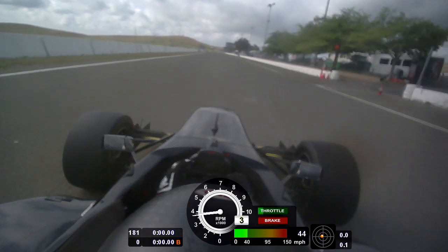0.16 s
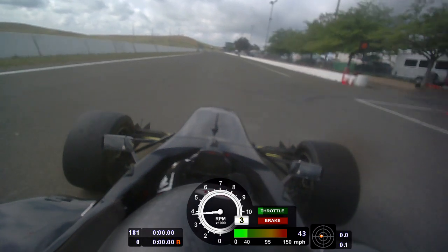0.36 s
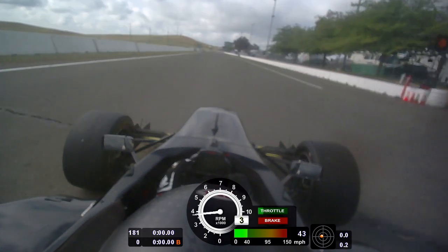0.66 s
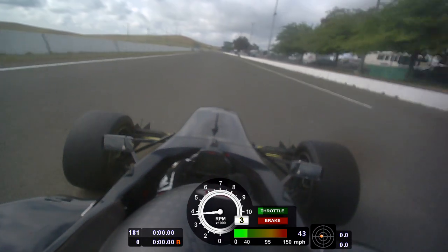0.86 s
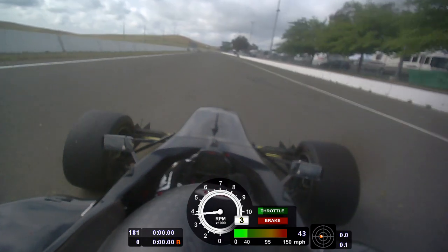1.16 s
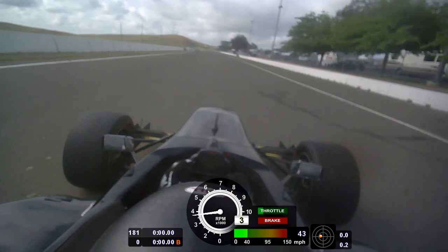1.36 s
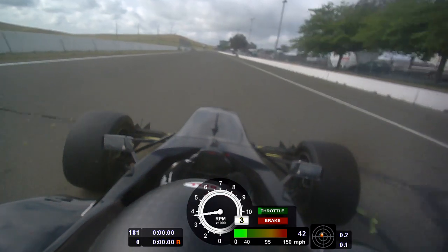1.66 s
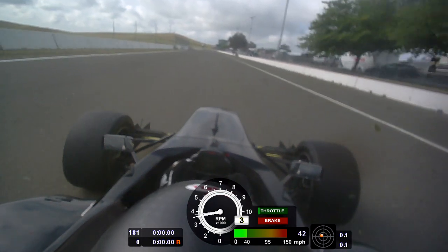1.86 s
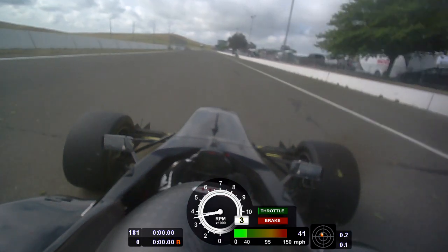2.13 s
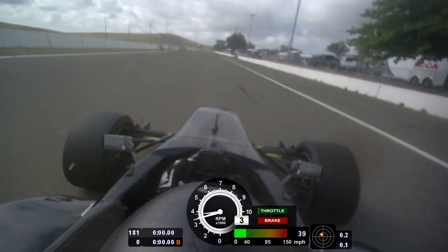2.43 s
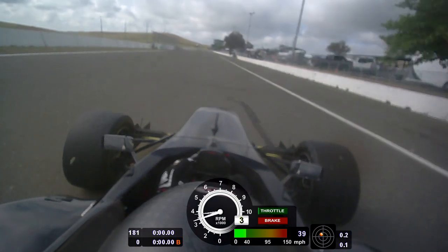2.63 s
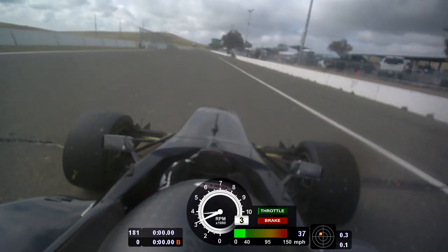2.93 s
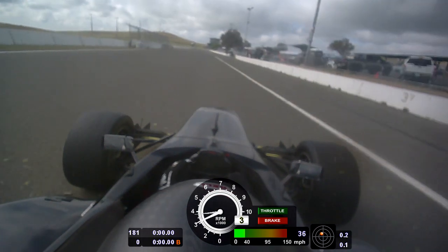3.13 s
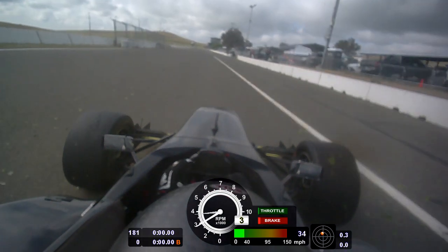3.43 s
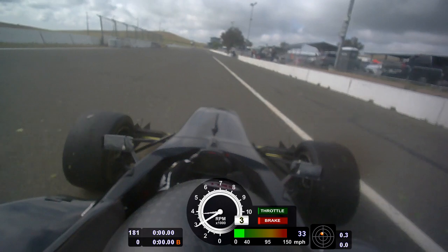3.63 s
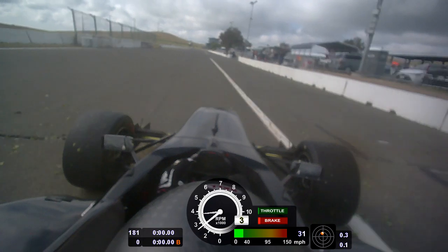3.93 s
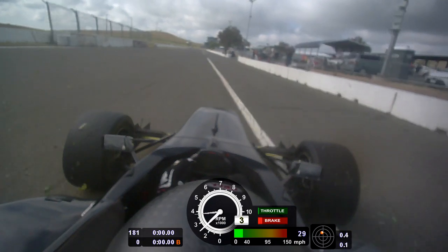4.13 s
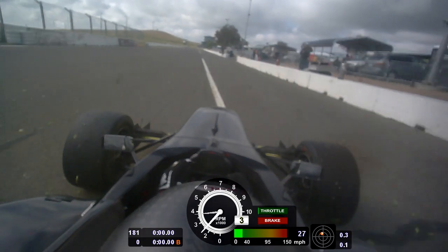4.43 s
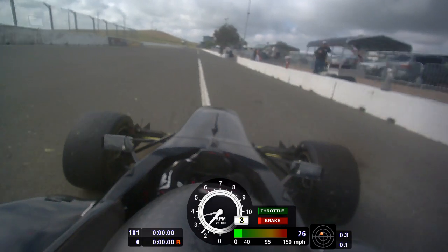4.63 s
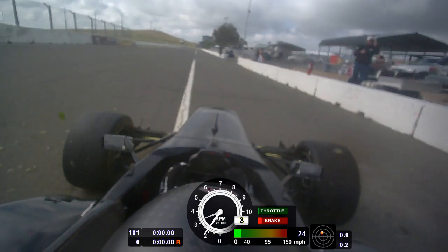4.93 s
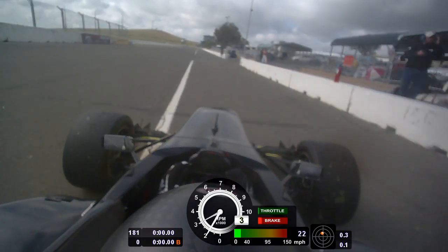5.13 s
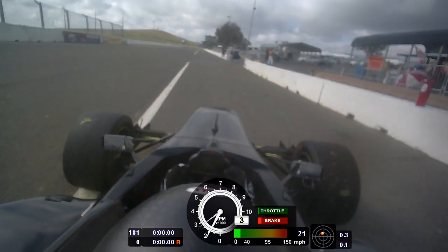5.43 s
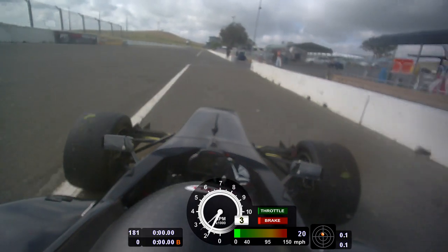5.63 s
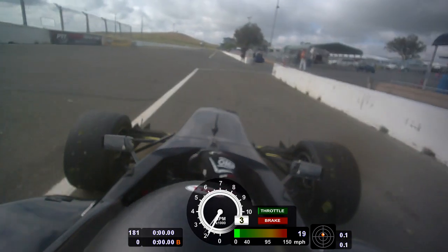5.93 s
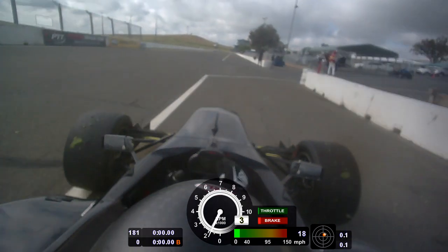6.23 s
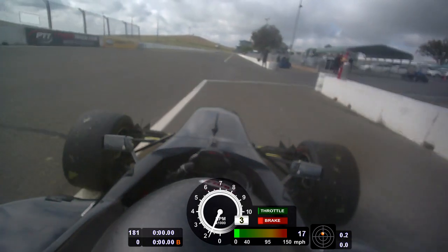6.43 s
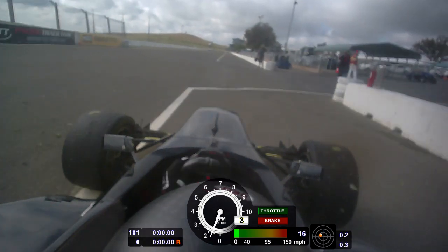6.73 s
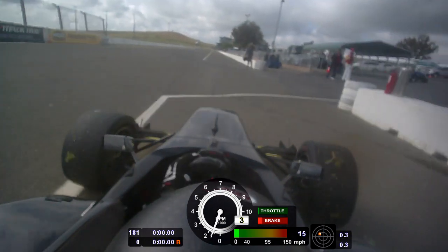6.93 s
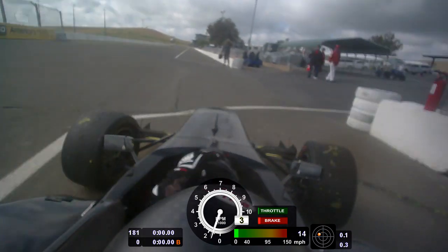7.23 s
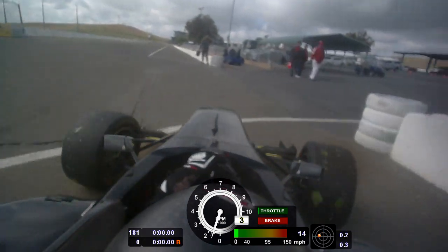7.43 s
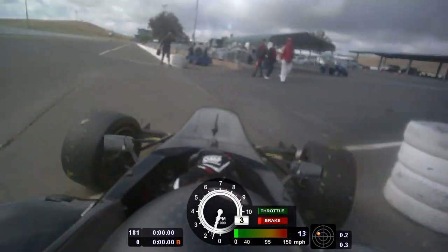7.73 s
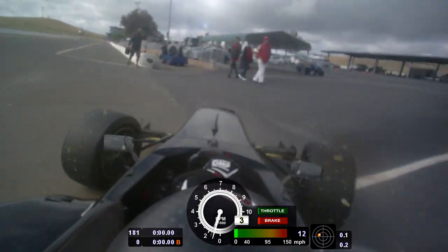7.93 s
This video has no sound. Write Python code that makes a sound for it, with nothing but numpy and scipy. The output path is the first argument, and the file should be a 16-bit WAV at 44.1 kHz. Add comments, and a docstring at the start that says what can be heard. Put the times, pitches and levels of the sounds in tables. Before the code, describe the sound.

A microphone fixed to an open-wheel car hears it slow down outdoors. First a buzzing four-cylinder engine and whining straight-cut gears at constant pitch over tyre rumble. After the lift-off the tone wobbles, turns boomy and glides downward. At low speed the car bucks, with throbbing exhaust surges and loose driveline clunks. Near the end the revs hop up and settle into a dry, ticking idle.

```python
"""On board a single-seater in the pit lane

A four-cylinder car cruises with whining gears, lifts off and booms on the overrun, lugs until the
driveline knocks through its backlash, then settles to a clattering idle. Firing and tooth meshing are
harmonics of the crank, shaped by pipe, gearbox and body resonances. Noise makes the rumble and hiss of
the tyres; short bursts make knocks and grit; gliding sines make two brake squeaks."""
import sys
import numpy as np
from scipy import signal
from scipy.fft import rfft, irfft, next_fast_len
from scipy.io import wavfile

SR = 44100
rng = np.random.default_rng(int(sys.argv[2]) if len(sys.argv) > 2 else 0)


def wav_out(sig):
    """Save sig, one row per channel (or a flat mono array), as 16-bit PCM at SR to the path in sys.argv[1]."""
    wavfile.write(sys.argv[1], SR, np.round(np.clip(np.atleast_2d(sig).T, -1, 1) * 32767).astype(np.int16))


N = 355887
TIME = np.arange(N) / SR

# crankshaft speed without the lurches: time_s, crank_turns_per_s
CRANK_SPEED = [(0, 63.2), (1.22, 63.1), (1.7, 60.1), (2.45, 56.0), (2.95, 52.3), (3.5, 46.8), (3.75, 44.6),
               (4.15, 40.4), (4.66, 36.5), (5.03, 29.5), (5.27, 27), (5.52, 32.5), (6.12, 23.4), (6.42, 22),
               (6.88, 22), (7.07, 40.8), (7.7, 34.5), (8.07, 33.2)]
# drivetrain state: time_s, throttle_0_to_1, steady_tooth_contact_0_to_1, clutch_free_0_to_1
DRIVE_STATE = [(0, 1, 1, 0), (.8, .75, 1, 0), (1.235, .8, 1, 0), (1.25, 0, 0, 0), (1.3, .3, .3, 0),
               (1.35, 0, 1, 0), (4.67, 0, 1, 0), (4.73, 0, 0, 0), (6.85, 0, 0, 0), (7.1, 0, 0, 1)]
# car lurches while lugging: centre_s, half_length_s, crank_kick_turns_per_s, boom_swell_db
CAR_LURCHES = [(4.785, 0.022, 0, 11.5), (4.872, .06, 2.5, 14), (5.033, 0.046, 0, 9.5),
               (5.124, 0.046, 4, 11), (5.278, 0.038, 0, 8.5), (5.349, .035, 3.5, 9.5),
               (5.5, 0.026, 0.92, 12), (5.616, 0.024, 1, 12.5), (5.795, 0.043, 0.43, 4),
               (5.939, 0.0517, 3, 7), (6.098, 0.037, 0, 6.5), (6.278, .08, 4.5, -2.5), (6.63, 0.084, 3, 7)]
# speed over the ground: time_s, road_speed_m_per_s
ROAD_SPEED = [(0, 19), (1.5, 19), (3, 16.5), (5, 10.3), (8.07, 5.4)]

# firing tones before pipe and pace: crank_multiple, throttle_db, overrun_db, lugging_db, idling_db
FIRING_TONES = [(2, -29.5, -11, -19.5, -36), (4, -12.5, -12, -27, -29), (6, -18, -21.5, -24, -18.5)]
# exhaust pass band, which the firing tones slide through: frequency_hz, gain_db
PIPE_PASS_BAND = [(55, -21), (86, -13.5), (102, -5.5), (116, 0.5), (128, -1), (145, 0), (172, -3.5),
                  (204, -24.5), (250, -25), (305, -33.5), (375, -21.5)]
# weaker engine orders at top crank speed: crank_multiple, throttle_db, overrun_db
WEAK_ENGINE_ORDERS = [(1, -39, -42), (1.5, -55, -47), (2.5, -52, -36), (3, -50, -41), (3.5, -36, -47),
                      (5, -53, -46), (8, -40, -53)]
# brief dips of the boom: centre_s, dip_db
BOOM_FALTERS = [(3.11, 6), (4.485, 10), (4.545, 9.5), (6.74, 12), (6.95, 15), (7.2, 5), (7.64, 7)]
FALTER_S, IDLE_FALTER_S = 0.014, 0.059   # half length with teeth in steady contact, and without
# exhaust pipe resonance, applied twice, and the nominal level of ragged firing
PIPE_HZ, PIPE_WIDTH_HZ, LUG_DB = 141.7, 26, -18
RAGGED_TOP_PACE = .55   # ragged firing grows with crank speed up to this share of top speed

# tooth tones before mounts and pace: mesh_multiple, throttle_db, overrun_db, flutter_db, flutter_pole_hz
TOOTH_TONES = [(1, -53.5, -53.5, 1.6, 31), (2, -54, -53.5, 2.4, 55), (3, -65, -63.5, 3, 40),
               (4, -52, -59, 3.5, 55), (5, -52, -70, 2, 35), (7, -63, -74.5, 2.5, 35),
               (8, -69, -77, 2.5, 35)]
# gearbox mount resonances: centre_hz, nominal_width_hz, power_lift_db
MOUNT_RESONANCES = [(605, 41, 17.5), (813, 43, 13.5), (863, 74, 16.5), (970, 100, 13.5), (1180, 120, 3.5),
                    (1380, 70, 7.5), (1815, 125, 17.5), (2400, 280, 8.5), (3140, 150, 5)]
# further gear lines, before the body resonances: crank_multiple, throttle_db, overrun_db
GEAR_LINES = [(13, -57, -65), (16, -55, -73.5), (29, -65, -61)]
# gear lines before the casing resonance: crank_multiple (sounded to the nearest half), throttle_db, overrun_db
CASING_LINES = [(28, -62, -57), (29, -64, -53), (31, -43.5, -61), (32.7, -54, -49.5), (35.1, -48, -50.5)]
GEARBOX_HZ, GEARBOX_WIDTH_HZ = 1856, 150   # ring of the gearbox casing
MESH_TEETH = 15
LOOSE_TEETH_DB, FREE_TEETH_DB = -5.5, -16   # whine when lugging, and with the clutch free
# the gears float for an instant as the throttle shuts
SLACK_S, SLACK_HALF_S, SLACK_WHINE_DB = 1.265, .026, -7

# force spectrum of the driven clatter: frequency_hz, relative_density_db_per_hz
CLATTER_SPECTRUM = [(200, 0), (450, 3.5), (900, 3.5), (1450, -2), (1900, 1), (2500, 0.5), (4400, -7.5),
                    (4900, -8.5), (7000, -15), (10000, -32), (12000, -32), (16000, -33)]
# force spectrum of the idling engine: frequency_hz, relative_density_db_per_hz
IDLE_SPECTRUM = [(200, -1.5), (330, 13), (480, -7.5), (900, 3.5), (1500, -3.5), (1900, -1), (2800, 0.5),
                 (4400, -5.5), (6200, -11), (8000, -20), (10000, -35), (12000, -36), (16000, -43)]
# nominal level at top crank speed; added under throttle
CLATTER_DB, CLATTER_LOAD_DB = -45.5, 6
# added at idle; rise with crank speed in gear
CLATTER_IDLE_DB, CLATTER_DB_PER_OCTAVE = -2.3, 5.5

# driveline knocks: start_s, nominal_level_db, decay_s
DRIVELINE_KNOCKS = [(1.291, -28.5, .007), (4.78, -38.5, 0.067), (5.04, -38.5, 0.036), (5.273, -32.5, .036),
                    (5.418, -30.5, .034), (5.518, -26.5, 0.03), (5.71, -34.5, 0.016), (5.803, -26, .026),
                    (5.96, -42, 0.12), (6.125, -38.5, .04), (6.282, -31.5, .034), (6.616, -33.5, 0.039),
                    (6.79, -36.5, 0.054), (6.925, -35.5, .03), (7.043, -30, 0.0082)]
# force spectrum of a knock: frequency_hz, relative_density_db_per_hz
KNOCK_SPECTRUM = [(100, 21), (380, 12), (550, -4.5), (850, 7.5), (1500, 0), (1900, 0.5), (2400, 2),
                  (3000, 0.5), (4400, -4), (5000, -6.5), (8000, -14), (10000, -21), (16000, -32)]
REBOUND_S, REBOUND_DB = 0.0179, -3.5   # each knock bounces back once

# brake squeaks: centre_s, nominal_pitch_hz, peak_db
BRAKE_SQUEAKS = [(6.248, 7950, -51), (6.722, 7750, -54)]

# force spectrum of the chassis rumble: frequency_hz, relative_density_db_per_hz
RUMBLE_SPECTRUM = [(20, -7.5), (45, -6.5), (75, -8.5), (120, 3.5), (180, -2), (250, -1), (330, -9),
                   (400, -15), (470, -19), (600, -17.5), (760, -25.5), (1100, -34), (2000, -55.5)]
# force spectrum of the tyre hiss: frequency_hz, relative_density_db_per_hz
HISS_SPECTRUM = [(350, -4), (520, 13), (750, 3), (2000, -4), (5000, -2), (7200, 0), (10000, -8),
                 (12000, -7.5), (16000, -26.5)]
# grit on the bodywork: start_s, nominal_level_db
GRIT_TICKS = [(2.1094, -35.5), (2.1774, -35), (2.695, -27.5), (2.7162, -38), (2.7247, -28.5), (2.8, -33),
              (3.0395, -36), (3.3623, -34), (3.8156, -36), (3.879, -33.5), (4.0156, -33.5), (4.2714, -37.5),
              (4.3, -39), (5.3236, -39), (5.78, -25), (6.7526, -41)]
# force spectrum of a grit tick: frequency_hz, relative_density_db_per_hz
TICK_SPECTRUM = [(1000, -14), (3000, -7), (4000, 4.5), (8000, 0), (13000, -4.5), (16000, -15)]
# nominal level at top road speed; added under throttle; rise with road speed
RUMBLE_DB, RUMBLE_LOAD_DB, RUMBLE_DB_PER_OCTAVE = -31, 4.5, 3.5
RUMBLE_SHAKE_DB, RUMBLE_LURCH_SHARE = 4.5, 0.19   # added after lift-off; share of a positive boom swell
HISS_DB, HISS_SHAKE_DB = -48, 2.5   # nominal level at top crank speed; added after lift-off
GRIT_DECAY_S, FINE_GRIT_DB, FINE_GRIT_UNTIL_S = 0.0028, -53, 4.5   # fine grit: lowest nominal level

# chassis and bodywork resonances: centre_hz, nominal_width_hz, power_lift_db
BODY_RESONANCES = [(337, 51, 2.5), (564, 110, 7), (818, 110, 7), (973, 127, 8.5), (1297, 150, 6.5),
                   (1833, 300, 10), (2214, 130, 4.5), (2800, 110, 3.5), (3104, 214, 6.5), (3380, 120, 2),
                   (3700, 240, 4.5), (4050, 130, 6.5), (4380, 183, 10), (5510, 350, 4.5), (9030, 350, 3)]

# the drivetrain rocks when the throttle shuts: the boom dips on each swing
LIFT_OFF_S, ROCK_HZ, ROCK_DIP_DB, ROCK_DECAY_S = 1.29, 8.6, 13.5, 0.23
SHAKE_DB, SHAKE_DECAY_S = 6, 0.49   # the gears rattle on for a while
BOOM_SAG_DB, BOOM_BUILD_S = 3.5, .3   # the overrun boom takes a moment to build
CUTOFF_HZ = 15900


def exhaust(turns, speed, pace, swell_db, throttle, meshed, lugging, free):
    """Periodic excitation: two firings a turn make the boom; unequal cylinders add the orders between."""
    boom = 0
    for k, (multiple, on_db, off_db, lug_db, idle_db) in enumerate(FIRING_TONES):
        driven_db = meshed * blend(on_db, off_db, throttle)
        load_db = driven_db + lug_db * lugging + idle_db * free
        pipe_db = at_hz(PIPE_PASS_BAND, multiple * speed)
        boom = boom + from_db(load_db + pipe_db) * tone(turns + k / 16, multiple)
    flutter_db = (0.7 + .8 * lugging + 1.0 * throttle) * drift(24)
    boom = boom * from_db(swell_db + falters(meshed) + flutter_db)
    between = orders(WEAK_ENGINE_ORDERS, turns, throttle, flutter_db=1.0, flutter_rate=6.6, scatter=1.99)
    # ragged firings set the pipe ringing at its own pitch
    ragged = resonate(rng.standard_normal(N), PIPE_HZ, PIPE_WIDTH_HZ)
    ragged = resonate(ragged, PIPE_HZ, PIPE_WIDTH_HZ)
    ragged_gain = np.minimum(pace, RAGGED_TOP_PACE) ** 3 * lugging * from_db(LUG_DB + .6 * swell_db)
    return pace * boom + pace ** 2 * between + ragged_gain * rms_one(ragged)


def gears(turns, speed, pace, throttle, meshed, lugging, free):
    """Tooth meshing, fifteen a turn; shaft twist modulates its phase, most when the teeth are loose."""
    twisted = turns + (.0009 + .0009 * throttle + .004 * lugging) * drift(24)
    whine = 0
    for multiple, on_db, off_db, flutter_db, flutter_rate in TOOTH_TONES:
        order = multiple * MESH_TEETH
        level_db = blend(on_db, off_db, throttle) + flutter_db * drift(flutter_rate)
        mount_gain = np.sqrt(lift(MOUNT_RESONANCES, order * speed))
        whine = whine + from_db(level_db) * mount_gain * tone(twisted, order)
    whine_db = LOOSE_TEETH_DB * lugging + FREE_TEETH_DB * free + SLACK_WHINE_DB * slack()
    # the weaker lines swell as they slide through the resonances
    lines = body(orders(GEAR_LINES, twisted, throttle, flutter_db=3.5, flutter_rate=35))
    casing = orders(CASING_LINES, twisted, throttle, flutter_db=4.5, flutter_rate=54)
    casing = resonate(casing, GEARBOX_HZ, GEARBOX_WIDTH_HZ)
    return whine * pace * from_db(whine_db) + meshed * (lines + casing)


def clatter(turns, throttle, free, clatter_db):
    """Amplitude-modulated impacts: gears rattle once a turn under throttle, the idle ticks at each firing."""
    per_turn = np.cos(2 * np.pi * turns)
    per_firing = np.cos(2 * np.pi * 2 * turns)
    driven_db = 4.5 + 2 * throttle + 1.4 * throttle * per_turn + 0.48 * per_firing
    driven = body_noise(CLATTER_SPECTRUM) * from_db(driven_db)
    idling = body_rattle(IDLE_SPECTRUM, per_s=3500) * from_db(3.2 * per_firing + 5.0)
    level_db = clatter_db - 3 * slack() + 0.98 * drift(69)
    # equal-power change from driven to idling
    return (np.sqrt(1 - free) * driven + np.sqrt(free) * idling) * from_db(level_db)


def driveline():
    """Impact across backlash: the gear dogs slam, rebound once and chatter to rest."""
    rebounds = [(s + REBOUND_S, db + REBOUND_DB, decay) for s, db, decay in DRIVELINE_KNOCKS]
    blows = bursts(DRIVELINE_KNOCKS + rebounds, attack_s=.001) * from_db(1.8 * drift(130))
    return body_rattle(KNOCK_SPECTRUM, per_s=4000) * blows * from_db(1.35)


def brakes():
    """Friction tone: a pad touches the disc and gives a short, sagging squeak."""
    out = np.zeros(N)
    for s, hz, db in BRAKE_SQUEAKS:
        age = np.clip(TIME - s, -.1, .1)
        pitch = hz * (1 - 1.3 * age + 0.00802 * drift(200))
        envelope = from_db(db) * np.exp(-(age / 0.0081) ** 2)
        out += envelope * np.sin(2 * np.pi * np.cumsum(pitch) / SR)
    return out


def tyres(throttle, pace, swell_db):
    """Random excitation: rumble follows road speed, hiss follows crank speed, and grit ticks sharply."""
    road, = in_time(ROAD_SPEED)
    shake = after_lift_off(SHAKE_DECAY_S)
    rumble_db = RUMBLE_DB + RUMBLE_LOAD_DB * throttle + RUMBLE_DB_PER_OCTAVE * np.log2(road / road.max())
    shaken_db = RUMBLE_SHAKE_DB * shake + RUMBLE_LURCH_SHARE * np.maximum(swell_db, 0)
    rumble = body_noise(RUMBLE_SPECTRUM) * from_db(rumble_db + shaken_db + 1.85 * drift(8.8))
    hiss_db = HISS_DB + HISS_SHAKE_DB * shake + 1.4 * drift(25)
    hiss = body_noise(HISS_SPECTRUM) * from_db(hiss_db) * pace ** 1.4
    fine = [(when * FINE_GRIT_UNTIL_S, FINE_GRIT_DB + 8 * size, GRIT_DECAY_S)
            for when, size in rng.random((24, 2))]
    stones = [(s, db, GRIT_DECAY_S) for s, db in GRIT_TICKS]
    grit = body_noise(TICK_SPECTRUM) * bursts(stones + fine, attack_s=.0004) * from_db(-3.5)
    return rumble + hiss + grit


def lurches():
    """Torsional surging: lurches kick the crank and shift the boom level: turns_per_s, swell_db."""
    kick, swell_db = 0, 0
    for s, half_s, turns_per_s, db in CAR_LURCHES:
        shape = np.exp(-((TIME - s) / half_s) ** 2)
        kick = kick + turns_per_s * shape
        swell_db = swell_db + db * shape
    rocking = after_lift_off(ROCK_DECAY_S) * np.cos(np.pi * ROCK_HZ * (TIME - LIFT_OFF_S)) ** 2
    return kick, swell_db - ROCK_DIP_DB * rocking - BOOM_SAG_DB * after_lift_off(BOOM_BUILD_S)


def falters(meshed):
    """Gaussian dips of the boom in dB, longer once the wheels no longer drive the crank."""
    half_s = FALTER_S * meshed + IDLE_FALTER_S * (1 - meshed)
    return -sum(db * np.exp(-((TIME - s) / half_s) ** 2) for s, db in BOOM_FALTERS)


def slack():
    """Backlash: near 1 while the gears float between drive and overrun, else near 0."""
    return np.exp(-((TIME - SLACK_S) / SLACK_HALF_S) ** 4)


def after_lift_off(decay_s):
    """Exponential decay: jumps to 1 as the throttle shuts, then dies away."""
    return (TIME > LIFT_OFF_S) * np.exp(-np.abs(TIME - LIFT_OFF_S) / decay_s)


def tone(turns, multiple):
    """Harmonic of rotation: a line of rms 1, locked to the nearest half order of the crank."""
    return np.sqrt(2) * np.cos(np.pi * np.round(2 * multiple) * turns)


def orders(table, turns, throttle, flutter_db, flutter_rate, scatter=0):
    """Order superposition: fluttering lines follow the throttle; scatter puts them out of step."""
    total = 0
    for multiple, on_db, off_db in table:
        level_db = blend(on_db, off_db, throttle) + flutter_db * drift(flutter_rate)
        total = total + tone(turns + scatter * rng.random(), multiple) * from_db(level_db)
    return total


def bursts(rows, attack_s):
    """Power summation of blow envelopes, given as start_s, level_db, decay_s."""
    power = np.zeros(N)
    for s, db, decay in rows:
        start = int(s * SR)
        age = TIME[:min(N - start, SR // 2)]
        blow = from_db(db) * (1 - np.exp(-age / attack_s)) * np.exp(-age / decay)
        power[start:start + len(age)] += blow ** 2
    return np.sqrt(power)


def body(force, spectrum=((20, 0), (20000, 0))):
    """Minimum-phase filtering: a force with this colour, heard through the resonances of the car."""
    size = 2 * next_fast_len(N // 2 + SR // 8)
    hz = np.maximum(np.arange(size // 2 + 1) * SR / size, 1)
    # minimum phase: the body rings after a blow, never before it
    gain = from_db(at_hz(spectrum, hz)) * np.sqrt(lift(BODY_RESONANCES, hz))
    cepstrum = irfft(np.log(gain))
    response = np.exp(rfft(2 * cepstrum[:size // 2], size) - cepstrum[0])
    return irfft(rfft(force, size) * response, size)[:N]


def body_noise(spectrum):
    """Random vibration: noise forces shake the car; rms 1."""
    return rms_one(body(rng.standard_normal(N), spectrum))


def body_rattle(spectrum, per_s):
    """Random impulses: many tiny metal contacts a second, each ringing the car; rms 1."""
    struck = rng.random(N) < per_s / SR
    contacts = struck * rng.choice([-1, 1], N) * rng.uniform(0.38, 1, N)
    return rms_one(body(contacts, spectrum))


def resonate(x, hz, width_hz):
    """Single resonance with gain 1 at its peak."""
    return signal.lfilter(*signal.iirpeak(hz, hz / width_hz, fs=SR), x)


def lift(resonances, hz):
    """Resonance superposition: power gain at these frequencies."""
    gain = 1
    for centre, width, db in resonances:
        gain = gain + (from_db(db) ** 2 - 1) / (1 + ((hz - centre) / (width * 2 / 3)) ** 2) ** 2
    return np.abs(gain)


def at_hz(spectrum, hz):
    """Spectral interpolation on a logarithmic frequency axis, in dB."""
    points = np.array(spectrum, float)
    return np.interp(np.log(hz), np.log(points[:, 0]), points[:, 1])


def drift(rate):
    """Low-pass random modulation: two poles at rate (Hz), spread 1."""
    r = np.exp(-80 * np.pi * rate / SR)   # computed on every 40th sample
    noise = rng.standard_normal(N // 40 + 2002)
    slow = signal.lfilter([1], [1, -2 * r, r * r], noise)[2000:]   # drop the filter's start-up
    return np.interp(np.arange(N) / 40, np.arange(len(slow)), rms_one(slow))


def in_time(rows):
    """Linear interpolation of each column of a curve, sample by sample."""
    s, *columns = np.transpose(rows)
    return [np.interp(TIME, s, column) for column in columns]


def blend(on_db, off_db, throttle):
    """Load dependence: level in dB between throttle and overrun."""
    return on_db * throttle + off_db * (1 - throttle)


def from_db(db):
    """Logarithmic level to amplitude gain."""
    return 10 ** (np.asarray(db) / 20)


def rms_one(x):
    """Power normalisation to rms 1."""
    return x / np.sqrt(np.mean(x ** 2) + 1e-20)


def scene():
    """Common rotation: crank speed and drivetrain state govern the sources, which add linearly."""
    cruise, = in_time(CRANK_SPEED)
    throttle, meshed, free = in_time(DRIVE_STATE)
    kick, swell_db = lurches()
    speed = cruise + kick
    turns = np.cumsum(speed) / SR
    pace = speed / speed.max()
    lugging = (1 - meshed) * (1 - free)   # in gear, but with the teeth loose
    clatter_db = (CLATTER_DB + CLATTER_DB_PER_OCTAVE * np.log2(pace) * (1 - free)
                  + CLATTER_LOAD_DB * throttle + CLATTER_IDLE_DB * free
                  + SHAKE_DB * after_lift_off(SHAKE_DECAY_S))
    engine = exhaust(turns, speed, pace, swell_db, throttle, meshed, lugging, free)
    whine = gears(turns, speed, pace, throttle, meshed, lugging, free)
    rattle = clatter(turns, throttle, free, clatter_db)
    mix = engine + whine + rattle + driveline() + brakes() + tyres(throttle, pace, swell_db)
    return mix[None]


def record(dry):
    """Band limitation: a steep elliptic low-pass removes the top of the treble."""
    return signal.sosfilt(signal.ellip(10, .2, 90, CUTOFF_HZ, fs=SR, output="sos"), dry)


dry = scene()
out = record(dry)
wav_out(out)
```